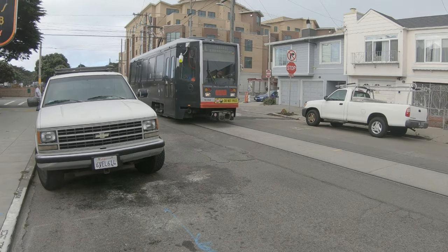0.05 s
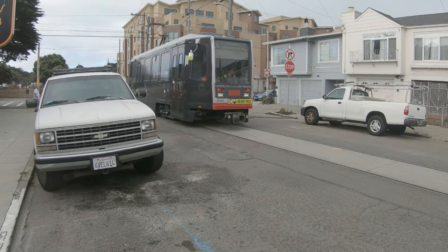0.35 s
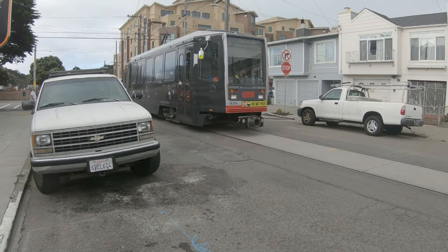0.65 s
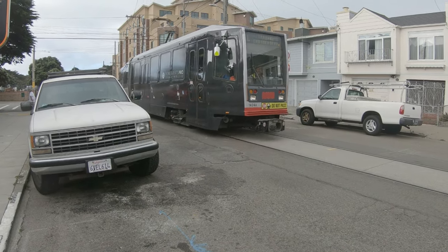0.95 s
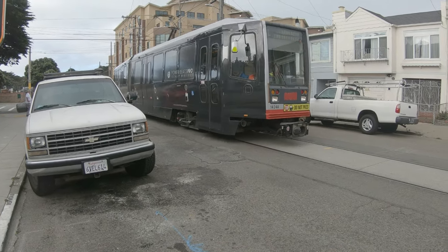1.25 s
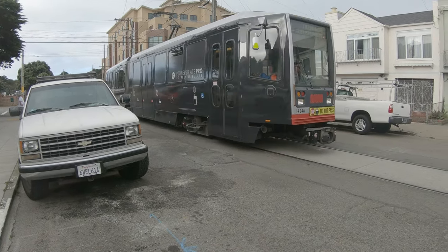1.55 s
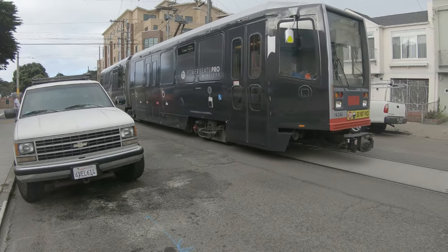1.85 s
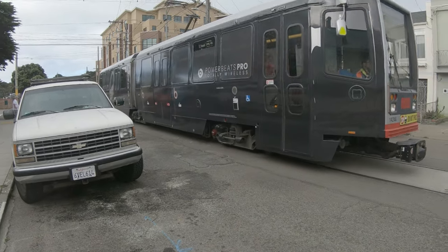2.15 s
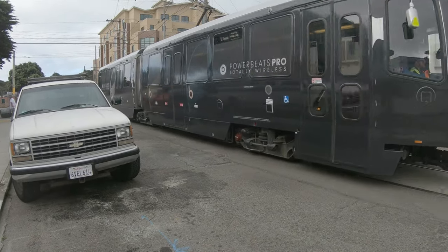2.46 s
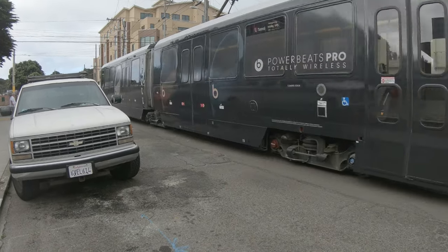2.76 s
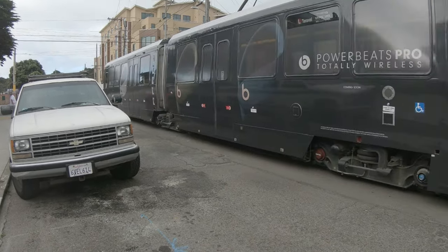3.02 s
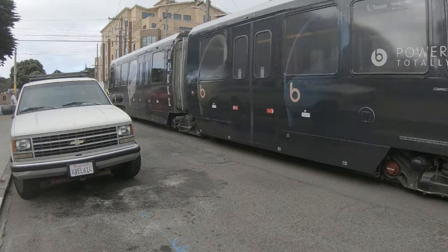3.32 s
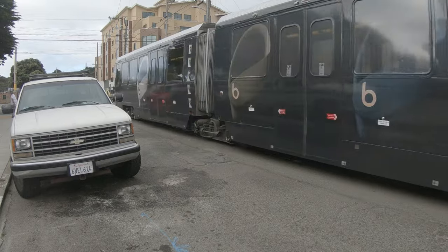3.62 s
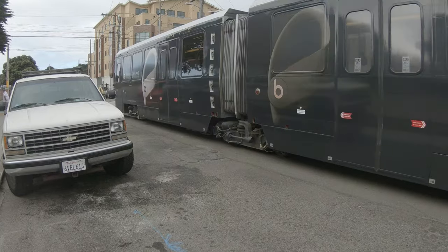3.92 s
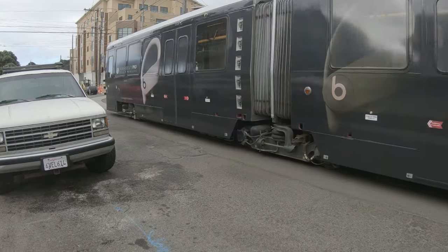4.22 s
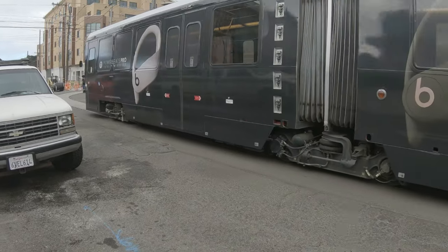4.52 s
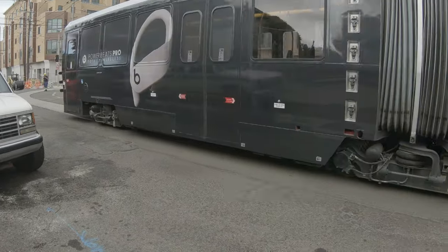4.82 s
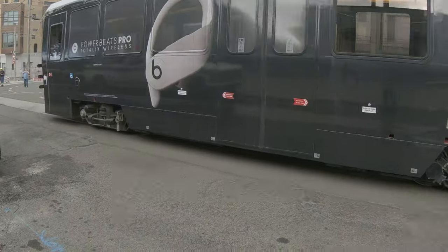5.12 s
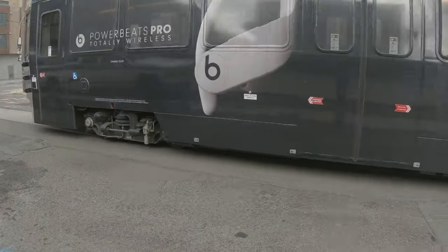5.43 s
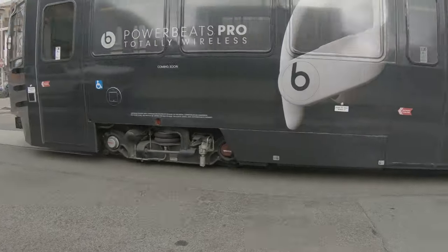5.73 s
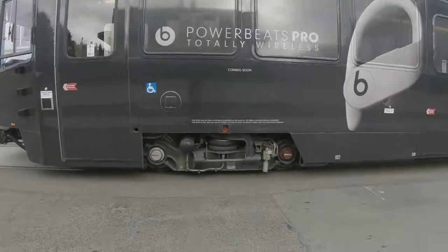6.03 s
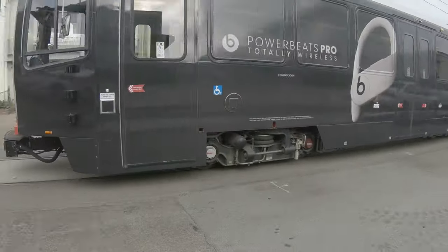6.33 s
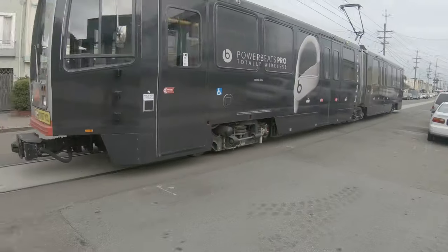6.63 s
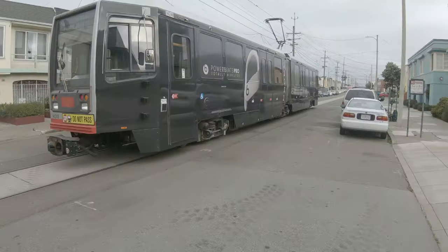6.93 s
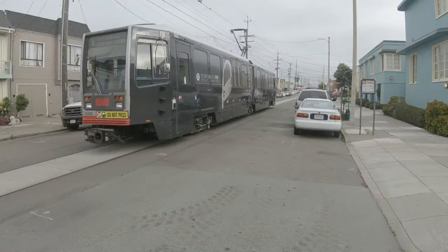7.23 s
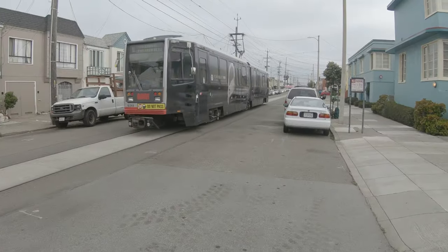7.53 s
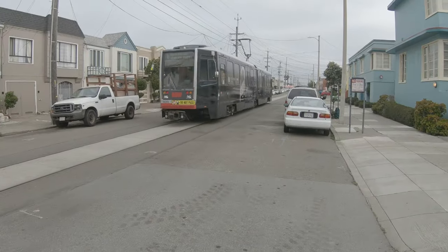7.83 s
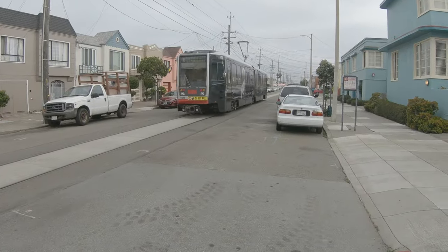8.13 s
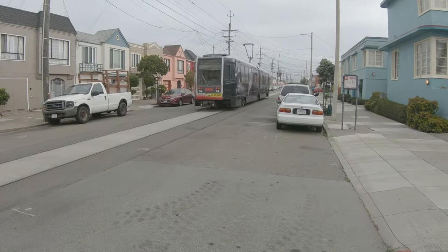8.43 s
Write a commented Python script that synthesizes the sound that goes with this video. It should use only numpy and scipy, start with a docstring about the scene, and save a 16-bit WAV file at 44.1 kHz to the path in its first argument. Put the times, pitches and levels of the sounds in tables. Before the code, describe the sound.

A tram rolls up a residential street, heard from the kerb, its low rumble growing while the rails ring faintly ahead of it. It passes a few metres away with roaring steel wheels, a steady drive whine, crackling grit and a few sharp ticks. Hums and moans glide through the body noise. A thin hiss trails the last wheels, and the rumble and wavering whine ease as it draws away.

```python
"""A street of houses, at the kerb: a two-section tram rolls up, passes a few metres off and draws away.
Rough rails shake its body and bogies into a rumble, the wheels roar and the drive whines near 1 kHz.
The rails sing ahead of it, the wheels crush grit and a thin hiss from the rims trails behind.
Hums, moans and thin whistles glide through, with sharp ticks, and pings and wavering swells near 1 kHz."""
import sys
import numpy as np
from scipy import signal
from scipy.fft import rfft, irfft
from scipy.io import wavfile
from scipy.ndimage import uniform_filter1d

SR = 44100
rng = np.random.default_rng(int(sys.argv[2]) if len(sys.argv) > 2 else 0)


def transcribe(signal):
    """Save signal, clipped to [-1, 1], as a 16-bit WAV file at the path in sys.argv[1]."""
    frames = np.atleast_2d(signal).T
    limited = np.clip(frames, -1, 1)
    pcm = np.round(limited * 32767).astype(np.int16)
    wavfile.write(sys.argv[1], SR, pcm)


N = 377937
TIME_S = np.arange(N) / SR
FREQS_HZ = np.fft.rfftfreq(3 * 2 ** 17, 1 / SR)
SPEED_M_S, SOUND_M_S = 6.0, 343

# three bogies passing: (nearest [s], base reach [m], road bed [dB], suspension [dB], frame growl [dB],
# track roar [dB], wheel grind [dB], grit [dB], rim hiss [dB])
BOGIE_PASSES = [(2.84, 2.26, -42, -33, -25, -31, -39.5, -37, -60),
                (4.5, 1.98, -31.5, -23, -23, -35, -37.5, -39, -45.5),
                (5.75, 4.02, -56, -21, -26.5, -31, -39.5, -44.5, -42)]
# uneven track: (middle [s], length [s], thud [dB], roar [dB])
TRACK_JOLTS = [(0.507, 0.66, -26.5, -41.5), (1.1, 0.74, -39, -47), (2.123, 0.46, -32, -36),
               (2.537, 0.44, -48, -32.5), (4.143, 0.31, -32, -35.5), (5.33, 0.072, -32, -36),
               (5.69, 0.2, -31, -30), (7.683, 0.2, -29.5, -36), (7.884, 0.085, -26, -33.5),
               (8.504, 0.31, -40, -36.5)]
# clean rail: (middle [s], length [s], gain [dB])
CLEAN_RAIL = [(1.55, 0.18, -5), (2.505, 0.039, -3.5), (2.7, 0.048, -4), (2.783, .045, -1.5),
              (3.584, 0.12, -5), (4.957, 0.086, -2), (5.216, 0.098, -1.5), (7.8, 0.063, -4)]
# car body drone: (time [s], pitch [Hz], level [dB])
BODY_DRONE = [(0, 64, -42), (.45, 63, -30), (.92, 65.8, -40), (1.05, 67.8, -19), (1.26, 66.2, -18.5),
              (1.5, 62.9, -34.5), (1.82, 73.9, -30.5), (2.05, 72, -20), (2.6, 63, -19.5), (3.0, 68, -23.5),
              (3.7, 81, -25), (4.05, 88, -20.5), (4.75, 93, -20.5), (5.1, 99.3, -18), (5.78, 101, -20),
              (6.3, 105, -23), (6.58, 105.9, -16.5), (7.03, 110, -16.5), (7.7, 101, -28.5),
              (8.57, 110, -26)]
# drive whine: (time [s], level [dB])
WHINE_LEVEL = [(0, -48), (.3, -51), (.58, -42), (1.0, -45.5), (1.5, -42.5), (1.9, -41), (2.1, -40),
               (3.3, -38.5), (3.55, -36.5), (4.0, -36), (4.6, -38), (5.4, -38.5), (5.8, -37.5), (6.95, -39),
               (7.15, -49.5), (7.75, -43.5), (8.57, -42.5)]
# rail singing, screened by the body once the first bogie is past: (time [s], level [dB])
SINGING_LEVEL = [(0, -54.5), (0.9, -49), (1.9, -49.5), (2.8, -44), (3.7, -55), (4.4, -54.5), (6.6, -55),
                 (8.57, -79)]
# gliding hums, moans, thin whistles and bands of hiss:
# (start [s], end [s], start pitch [Hz], end pitch [Hz], width [Hz], level [dB])
GLIDING_BANDS = [(.06, 0.375, 147, 145, 9.7, -26.5), (0.231, 0.716, 286.7, 286, 7, -35),
                 (0.335, 0.603, 256, 253.5, 4.5, -35), (.44, 0.74, 526, 520, 35, -35.5),
                 (0.3, 1.9, 972, 975, 54, -44), (0.571, 0.801, 1400, 1416, 45, -47),
                 (0.8, 2.15, 255.5, 259, 1.5, -33.5), (1.176, 1.694, 1382, 1379, 29, -50),
                 (.3, 2.3, 7750, 7560, 550, -63), (1.4, 2.47, 3413, 3430, 125, -48.5),
                 (2.05, 3.01, 447.8, 462.6, 48, -32), (2.202, 3.2, 955, 981, 68, -36),
                 (2.8, 3.5, 477, 486, 36, -36.5), (3.45, 3.95, 167.8, 176.4, 26, -29),
                 (3.92, 4.5, 255, 242.6, 17, -26.5), (4.05, 5.089, 280, 315.9, 73, -29.5),
                 (3.6, 4.9, 670.3, 722.4, 110, -38), (5.001, 5.498, 378, 427.6, 116, -31.5),
                 (5.2, 5.45, 261.8, 282, 34, -25.5), (5.62, 5.92, 127, 114.9, 4.4, -19.5),
                 (5.75, 6.13, 237.2, 247.4, 14, -31), (6.19, 6.34, 351, 350, 8.6, -34),
                 (5.331, 6.0, 9180, 9550, 390, -49), (5.3, 6.3, 5750, 5880, 900, -46),
                 (5.349, 6.1, 3510, 3450, 900, -52), (5.5, 6.546, 7600, 7380, 220, -52),
                 (5.7, 6.5, 11960, 11500, 900, -62), (6.2, 6.65, 9400, 9330, 520, -51),
                 (6.9, 7.65, 9130, 9050, 200, -67)]
# sand patches: (start [s], length [s], level [dB], relative splinters [dB], relative wheel ring [dB])
SAND_PATCHES = [(0.102, 0.13, -54, -34, -4), (0.208, 0.15, -56, -30, 6), (0.465, 0.12, -47, -22, -2),
                (.51, 0.13, -54.5, -25, 10), (0.638, .14, -51, -35, 2), (0.741, 0.09, -45, -22, 2),
                (0.987, 0.15, -39.5, -6.5, -3), (1.196, 0.1, -40, -20, -1), (1.285, 0.13, -45.5, -24, 4),
                (1.648, 0.077, -45, -16, -10), (1.966, 0.076, -42.5, -20, -13), (2.039, .11, -41.5, -22, 3),
                (2.172, 0.12, -36, -17, -2), (2.346, 0.19, -35, -17, -3), (2.51, 0.12, -38, -19, -3),
                (2.603, 0.045, -44, -22, -1), (2.718, 0.058, -38, -15, -10), (2.803, 0.11, -36.5, -23, 0.5),
                (2.852, .1, -37, -18, -2), (2.953, 0.11, -35, -26, 1), (3.08, 0.15, -43.5, -17, 5.5),
                (3.218, 0.056, -43, -14, -10), (3.31, 0.15, -46, -11, -6), (3.477, 0.051, -44, -7, -8),
                (3.825, 0.058, -41, -11, -9), (4.093, 0.097, -43, -16, -3), (4.58, 0.11, -42, -18, -3),
                (5.51, 0.16, -44, -18, 0), (6.765, 0.13, -40, -20, 0.5), (7.621, 0.19, -46, -34, -3),
                (7.824, 0.086, -47.5, -20, -1)]
# sharp ticks, and short pings near 1 kHz: (time [s], ring [Hz], t60 [s], level [dB])
TICKS_AND_PINGS = [(1.404, 6260, .025, -41), (1.658, 7700, .05, -39), (2.205, 6900, .02, -35),
                   (2.226, 1040, 0.026, -16), (2.402, 6400, .02, -32), (2.549, 2200, .025, -26),
                   (2.622, 3290, .02, -33), (2.749, 7300, 0.027, -31), (2.815, 3220, .02, -29),
                   (3.123, 2360, .02, -31), (3.334, 7300, .02, -34), (3.684, 7200, 0.048, -31),
                   (3.717, 7210, 0.022, -33), (3.906, 7360, .015, -36), (3.93, 7400, .015, -36),
                   (4.102, 7660, .035, -32), (5.957, 7580, 0.04, -28), (6.507, 1070, 0.029, -28),
                   (6.767, 6050, .03, -36), (7.478, 5940, 0.018, -32)]
# brief swells of a wavering tone near 1 kHz: (time [s], level [dB])
TONE_SWELLS = [(3.42, -31.5), (3.52, -34), (3.565, -29.5), (3.69, -28), (3.76, -32), (3.96, -31.5),
               (5.04, -30.5), (5.13, -34), (5.24, -33), (5.43, -30.5), (5.77, -30), (5.92, -33),
               (6.0, -33.5), (6.07, -33), (6.3, -27), (6.41, -32), (6.53, -29.5), (6.615, -29.5),
               (6.72, -32), (6.82, -30.5), (6.97, -36.5), (7.28, -41), (7.7, -33), (7.85, -31.5),
               (8.01, -38), (8.35, -36), (8.53, -41)]
# gliding band in the rim hiss: (time [s], centre [Hz])
RIM_GLIDE = [(4.4, 5580), (6.4, 6020), (7.1, 5870), (8.57, 5710)]
# source spectra: (frequency [Hz], relative density [dB])
ROAD_BED_SPECTRUM = [(15, 3), (30, -3), (48, 1), (60, 10.5), (80, 6.5)]
FRAME_SPECTRUM = [(70, 0.5), (120, 0), (170, 0), (240, -1), (320, -6), (400, -18.5), (520, -18), (700, -24),
                  (1200, -57)]
TRACK_SPECTRUM = [(250, 0), (370, 2), (470, -1.5), (560, -5.5), (660, -1), (780, 0), (860, -3), (960, 3),
                  (1080, 1), (1300, -18)]
WHEEL_SPECTRUM = [(800, 1), (1280, 2.5), (1550, 2), (1950, -0.5), (2250, -2), (2550, -3), (2900, -14),
                  (3400, -7), (4000, -15.5), (7000, -35)]
RAIL_SPECTRUM = [(1900, -35), (2280, -3.5), (2700, -19), (3100, -2.5), (3420, -3.5), (3650, -8),
                 (4000, -19.5)]
SAND_SPECTRUM = [(700, -46), (1600, 7), (3300, 1.5), (4000, -1.5), (4700, -5.5), (5900, -0.5), (6700, -0.5),
                 (7650, 3), (8100, -3.5), (9500, -5), (11000, -16), (13000, -19), (15500, -29)]
RIM_SPECTRUM = [(2200, -28), (2650, 6.5), (3000, -7.5), (4900, -9), (5500, -8.5), (6500, -3.5), (7400, -7),
                (8000, -8.5), (9300, -3.5), (10200, -8.5), (11000, -14.5), (11700, -18), (15000, -25)]
SPLINTER_SPECTRUM = [(7500, 5), (11000, -1), (14500, -11)]
# microphone port balance: (frequency [Hz], left minus right [dB])
PORT_BALANCE = [(60, 1), (110, 0), (200, -3.5), (400, -6), (560, -8.5), (680, -14.5), (900, -5.5),
                (1150, -4), (2000, -3), (2900, -1.5), (4500, -4.5), (6200, -10.5), (8500, -2),
                (15000, -2.5)]
# port likeness: (frequency [Hz], coherence [0-1])
PORT_COHERENCE = [(60, 0.94), (250, 0.87), (430, 0.89), (580, 0.22), (750, 0.71), (1100, 0.62),
                  (1500, 0.29), (3300, 0.7), (5000, 0.12), (12000, 0.1)]
# port phase, tram end-on and side-on: (frequency [Hz], left lead [rad])
END_ON_PHASE = [(60, 0.061), (520, -0.47), (680, 1.5), (1300, 1.4), (2000, 1.3), (3200, 0.78),
                (4400, -0.31), (12000, -0.23)]
SIDE_ON_PHASE = [(60, 0), (300, 0.43), (450, 0.3), (600, -1.7), (700, -3.5), (900, -4), (2000, -4.5),
                 (3500, -5), (5000, -5), (12000, -4.5)]


def undb(db):
    """Decibels to gain."""
    return 10 ** (np.asarray(db) / 20)


def unit(x):
    """Scale to rms 1."""
    return x / np.sqrt(np.mean(np.abs(x) ** 2))


def curves(table):
    """Columns of a time table, per sample."""
    times_s, *columns = np.transpose(table)
    return [np.interp(TIME_S, times_s, column) for column in columns]


def over_hz(table, freqs_hz):
    """Interpolate a table over log frequency."""
    hz, value = np.transpose(table)
    return np.interp(np.log(freqs_hz + 1), np.log(hz), value)


def filtered(x, gain):
    """Apply a gain per frequency."""
    size = 2 * (len(FREQS_HZ) - 1)
    return irfft(rfft(x, size) * gain, size)[..., :N]


def colour(x, spectrum):
    """Filter by a spectrum, rolled off past its ends; rms 1."""
    skirts = (1 + (spectrum[0][0] / (FREQS_HZ + 1)) ** 4) * (1 + (FREQS_HZ / spectrum[-1][0]) ** 4)
    return unit(filtered(x, undb(over_hz(spectrum, FREQS_HZ)) / np.sqrt(skirts)))


def noise():
    """Two unrelated noises: direct sound, and scatter from road and house fronts."""
    return rng.standard_normal((2, N))


def walk(rate_hz):
    """Smooth random drift; rms 1."""
    return unit(filtered(rng.standard_normal(N), np.exp(-(FREQS_HZ / rate_hz) ** 2)))


def swell(middle_s, length_s):
    """Gaussian rise and fall; peak 1."""
    return np.exp(-2 * ((TIME_S - middle_s) / length_s) ** 2)


def resonance(hz, width_hz, steady):
    """Randomly driven resonance; a constant load (steady, 0-1) evens out its swells."""
    real, imag = filtered(rng.standard_normal((2, 2, N)), (1 + (2 * FREQS_HZ / width_hz) ** 6) ** -.5)
    power = uniform_filter1d(real ** 2 + imag ** 2, SR // 14, axis=-1)
    phase = 2 * np.pi * np.cumsum(hz * np.ones(N)) / SR
    return unit((real * np.cos(phase) - imag * np.sin(phase)) / power ** (steady / 2))


def grains(per_s, spread_db):
    """Dense tiny cracks of random size."""
    size = undb(spread_db * np.minimum(rng.exponential(size=N), 5))
    return unit(noise() * size * (rng.random(N) < per_s / SR))


def rolling(bogies_db, spread, ahead_db, behind_db):
    """Rolling gain: each bogie falls as 1 / distance, over the street's echo; spread scales its reach."""
    power = undb(np.linspace(ahead_db, behind_db, N)) ** 2
    for (nearest_s, reach_m, *_), db in zip(BOGIE_PASSES, bogies_db):
        along_m = SPEED_M_S * (TIME_S - nearest_s)
        power += undb(db) ** 2 / (1 + (along_m / (reach_m * spread)) ** 2)
    return np.sqrt(power)


def jolts():
    """Thud and roar gains from uneven track."""
    thud = sum(undb(db) * swell(s, length_s) for s, length_s, db, _ in TRACK_JOLTS)
    roar = sum(undb(db) * swell(s, length_s) for s, length_s, _, db in TRACK_JOLTS)
    return thud, roar


def clean_rail_db():
    """Dips in grind, crackle and hiss on clean, smooth rail."""
    return sum(db * swell(s, length_s) for s, length_s, db in CLEAN_RAIL)


def body_rumble(road_bed_db, suspension_db, thud):
    """Rough rails shake road bed and suspension; the car body drones, rising as it passes."""
    road_bed_gain = np.hypot(rolling(road_bed_db, spread=1.6, ahead_db=-49, behind_db=-54), thud)
    road_bed = colour(noise(), ROAD_BED_SPECTRUM) * road_bed_gain
    ring = resonance(126.5, width_hz=20.4, steady=0.48)
    ring *= rolling(suspension_db, spread=0.87, ahead_db=-34, behind_db=-26)
    rumble = resonance(100, width_hz=28, steady=0.25)
    rumble *= rolling(suspension_db - 8.5, spread=2.0, ahead_db=-39, behind_db=-32)
    drone_hz, drone_db = curves(BODY_DRONE)
    drone = resonance(drone_hz, width_hz=17, steady=.95) * undb(drone_db)
    return road_bed + ring + rumble + drone


def running_gear(growl_db, roar_db, grind_db, jolt):
    """Bogie frames growl, track roars, steel wheels grind; jolts feed frames and track."""
    growl_gain = np.hypot(rolling(growl_db, spread=1.73, ahead_db=-42.5, behind_db=-36.5),
                          undb(5.5) * jolt)
    roar_gain = np.hypot(rolling(roar_db, spread=1.0, ahead_db=-56, behind_db=-38), jolt)
    grind_gain = rolling(grind_db, spread=1.0, ahead_db=-48.5, behind_db=-45)
    growl = colour(noise(), FRAME_SPECTRUM) * growl_gain * undb(walk(36))
    roar = colour(noise(), TRACK_SPECTRUM) * roar_gain * undb(1.85 * walk(19))
    grind = colour(noise(), WHEEL_SPECTRUM) * grind_gain * undb(clean_rail_db() / 2 + 1.06 * walk(27))
    return growl + roar + grind


def passing_pitch_hz(source_hz=1074, nearest_s=5.95, distance_m=3.22, wander=0.01098):
    """A wandering pitch that drops in passing (Doppler)."""
    along_m = SPEED_M_S * (TIME_S - nearest_s)
    receding_m_s = SPEED_M_S * along_m / np.hypot(along_m, distance_m)
    return source_hz / (1 + receding_m_s / SOUND_M_S) * (1 + wander * walk(7))


def drive_whine(pitch_hz):
    """The drive whines: a firm core in a wider, rougher skirt."""
    whine_db, = curves(WHINE_LEVEL)
    core = undb(-1.5) * resonance(pitch_hz, width_hz=59, steady=0.85)
    skirt = resonance(pitch_hz, width_hz=167, steady=0.32)
    return (core + skirt) * undb(whine_db + walk(18))


def rail_singing():
    """The rails ring ahead of the wheels."""
    singing_db, = curves(SINGING_LEVEL)
    return colour(noise(), RAIL_SPECTRUM) * undb(singing_db + 1.4 * walk(13))


def gliding_bands(steady=0.35):
    """Gliding hums, moans, thin whistles and bands of hiss; the narrower, the purer."""
    out = np.zeros((2, N))
    chance = noise() + 1j * noise()
    for start_s, end_s, from_hz, to_hz, width_hz, db in GLIDING_BANDS:
        inside = (TIME_S > start_s) & (TIME_S < end_s)
        progress = np.linspace(0, 1, inside.sum())
        lowpass = signal.butter(2, width_hz / 2, fs=SR, output="sos")
        waver = signal.sosfilt(lowpass, chance[:, :len(progress)])
        waver /= (np.abs(waver) + 1e-12) ** steady  # evens the swells
        glide_hz = from_hz + (to_hz - from_hz) * progress
        tone = (waver * np.exp(2j * np.pi * np.cumsum(glide_hz) / SR)).real
        arch = np.sqrt(np.abs(np.sin(np.pi * progress)))
        out[:, inside] += undb(db) * np.array([unit(row) for row in tone]) * arch
    return out


def grit(grit_db, nose_s):
    """Sand crackles under the treads; thicker patches flare, splinter and ring the wheel."""
    screen_db = np.interp(TIME_S - nose_s, [-.5, -.1], [-7, 0])  # the nose hides the wheels at first
    crackle = colour(grains(per_s=12000, spread_db=0), SAND_SPECTRUM) * undb(0.89 * walk(25))
    crackle *= rolling(grit_db, spread=1.0, ahead_db=-59, behind_db=-59)
    crackle *= undb(screen_db + clean_rail_db())
    crush_gain, splinter_gain, ring_gain = np.zeros((3, N))
    for start_s, length_s, db, splinter_db, ring_db in SAND_PATCHES:
        age = np.maximum(TIME_S - start_s, 0) / (length_s * 0.37)
        flare = undb(db) * (age * np.exp(1 - age)) ** 2
        crush_gain += flare
        splinter_gain += undb(splinter_db) * flare
        ring_gain += undb(ring_db) * flare
    crush = crush_gain * colour(grains(per_s=12000, spread_db=-0.5), SAND_SPECTRUM)
    splinters = splinter_gain * colour(grains(per_s=2400, spread_db=2), SPLINTER_SPECTRUM)
    ring = ring_gain * colour(noise(), WHEEL_SPECTRUM)
    return crackle + crush + splinters + ring


def ticks_and_pings(crack_gain=0.7):
    """Sharp ticks, and short pings near 1 kHz: a brief crack and a damped ring."""
    out = np.zeros((2, N))
    age_s = TIME_S[:SR // 8]
    for start_s, hz, t60_s, db in TICKS_AND_PINGS:
        fade = np.exp(-np.log(1000) * age_s / t60_s)
        band = signal.butter(3, [hz / 1.35, hz * 1.3], "bandpass", fs=SR, output="sos")
        crack = crack_gain * fade * unit(signal.sosfilt(band, rng.standard_normal((2, len(age_s)))))
        ring = np.sin(2 * np.pi * hz * age_s)
        at = int(start_s * SR)
        out[:, at:at + len(age_s)] += undb(db) * fade * (ring + crack)
    return out


def tone_swells(pitch_hz, waver=0.01758):
    """Brief swells of a wavering tone near 1 kHz."""
    tone_hz = [pitch_hz * (1 + waver * walk(24.06)) for _ in range(2)]
    tone = unit(np.sin(2 * np.pi * np.cumsum(tone_hz, axis=1) / SR))
    return tone * sum(undb(db) * swell(s, length_s=0.034) for s, db in TONE_SWELLS)


def rim_hiss(hiss_db):
    """Rims rub the rails: a hiss with one gliding band, thrown backwards."""
    rim_hz, = curves(RIM_GLIDE)
    hiss = colour(noise(), RIM_SPECTRUM)
    band = undb(-5) * resonance(rim_hz * (1 + .012 * walk(8)), width_hz=520, steady=.2)
    last_bogie_s = BOGIE_PASSES[-1][0]
    screen_db = np.interp(TIME_S - last_bogie_s, [-.75, -.25], [-6.5, 0])
    gain = rolling(hiss_db, spread=1.26, ahead_db=-85, behind_db=-73)
    return (hiss + band) * gain * undb(screen_db + clean_rail_db() + 1.7 * walk(20))


def alongside(nose_s, tail_s, turn_s=0.25, end_on_share=0.066):
    """How far side-on the tram is, 0-1."""
    flank = (np.tanh((TIME_S - nose_s) / (2 * turn_s)) - np.tanh((TIME_S - tail_s) / (2 * turn_s))) / 2
    return end_on_share + (.95 - end_on_share) * flank


def street_paths(freqs_hz, side_on, ripple_db=2.5, far_db=7, dull_hz=10800):
    """Gain by frequency and time: shifting reflections ripple the spectrum, distance dulls the top."""
    ripple = rng.standard_normal((len(freqs_hz), len(side_on)))
    ripple = unit(uniform_filter1d(uniform_filter1d(ripple, size=5, axis=0), size=16, axis=1))
    depth_db = ripple_db * freqs_hz / (freqs_hz + 700)
    loss_db = far_db * (1 - side_on) * freqs_hz ** 6 / (freqs_hz ** 6 + dull_hz ** 6)
    return undb(depth_db * ripple - loss_db)


def microphone_ports(sound, side_on):
    """Two ports hear the street: alike in the bass, parting in phase as the tram comes alongside."""
    freqs_hz, frames_s, (direct, scatter) = signal.stft(sound, SR, nperseg=2048)
    freqs_hz = freqs_hz[:, None]
    share = np.interp(frames_s, TIME_S, side_on)
    end_phasor = np.exp(1j * over_hz(END_ON_PHASE, freqs_hz))
    side_phasor = np.exp(1j * over_hz(SIDE_ON_PHASE, freqs_hz))
    lead_rad = np.angle((1 - share) * end_phasor + share * side_phasor)
    left_gain = undb(over_hz(PORT_BALANCE, freqs_hz)) * np.exp(1j * lead_rad)
    alike = np.sqrt(over_hz(PORT_COHERENCE, freqs_hz))
    common, apart = np.sqrt(1 + alike) * direct, np.sqrt(1 - alike) * scatter
    sum_gain = np.sqrt((1 + np.abs(left_gain) ** 2) / 2 + alike * left_gain.real)
    ports = np.array([left_gain * (common + apart), common - apart]) / sum_gain  # flat in sum
    return signal.istft(ports * street_paths(freqs_hz, share), SR)[1][:, :N]


def scene(nose_s=2.39, tail_s=7.1):
    """The passing tram, from the kerb."""
    levels_db = np.transpose(BOGIE_PASSES)[2:]
    road_bed_db, suspension_db, growl_db, roar_db, grind_db, grit_db, hiss_db = levels_db
    thud, jolt = jolts()
    mix = body_rumble(road_bed_db, suspension_db, thud) + running_gear(growl_db, roar_db, grind_db, jolt)
    pitch_hz = passing_pitch_hz()
    mix += drive_whine(pitch_hz) + rail_singing() + gliding_bands() + grit(grit_db, nose_s)
    mix += ticks_and_pings() + tone_swells(pitch_hz) + rim_hiss(hiss_db)
    return microphone_ports(mix, alongside(nose_s, tail_s))


def record(dry, top_hz=15600):
    """Steep low-pass."""
    return signal.sosfilt(signal.ellip(10, .1, 80, top_hz, fs=SR, output="sos"), dry)


dry = scene()
out = record(dry)
transcribe(out)
```